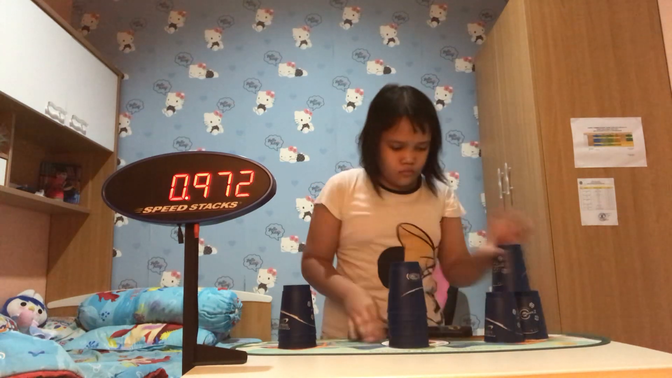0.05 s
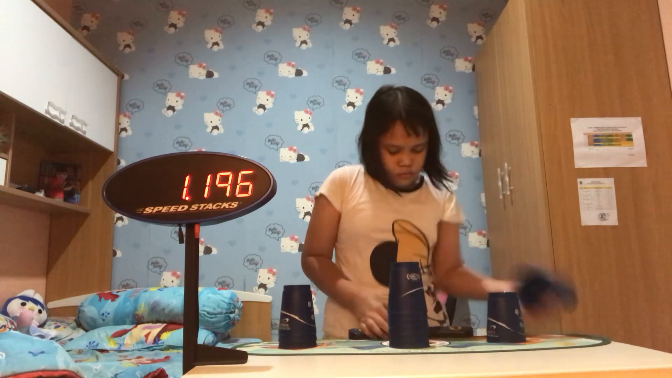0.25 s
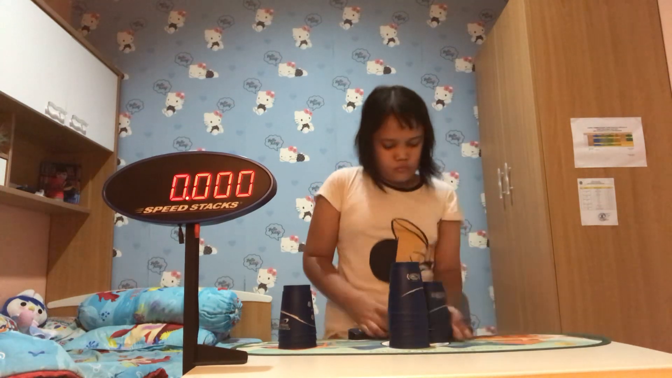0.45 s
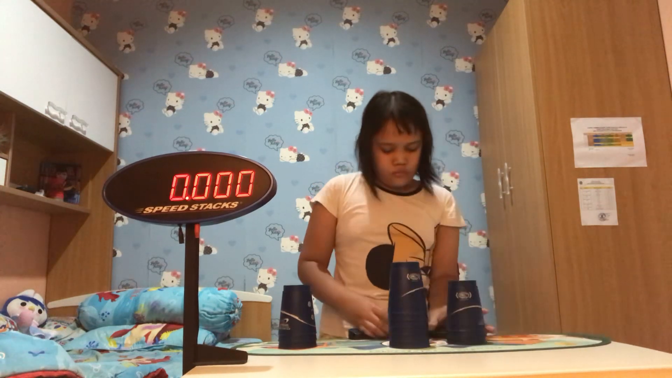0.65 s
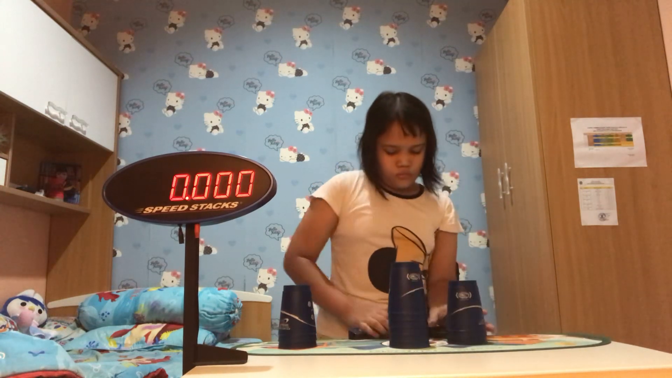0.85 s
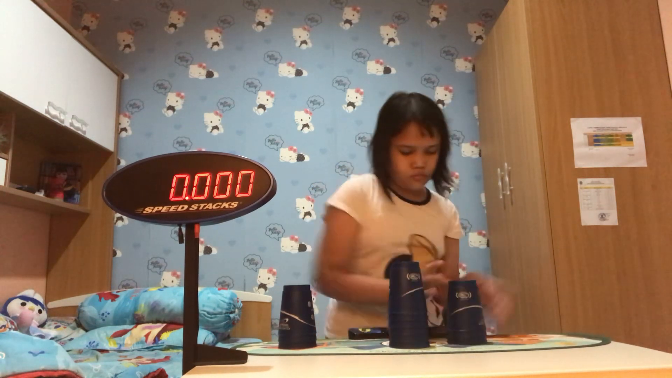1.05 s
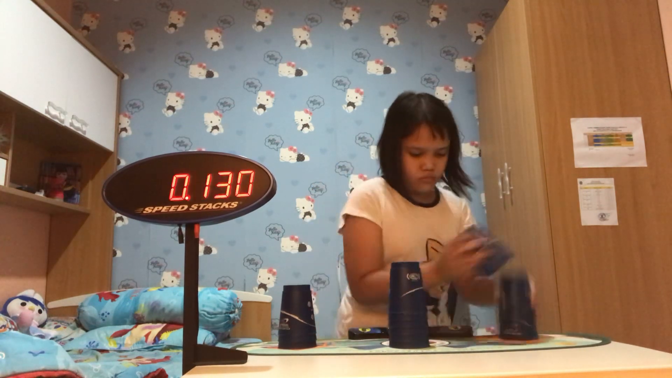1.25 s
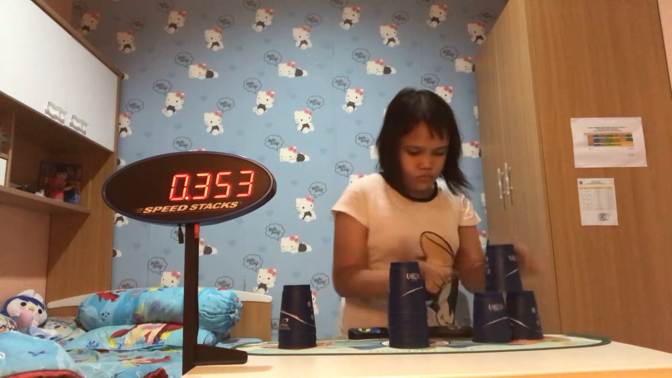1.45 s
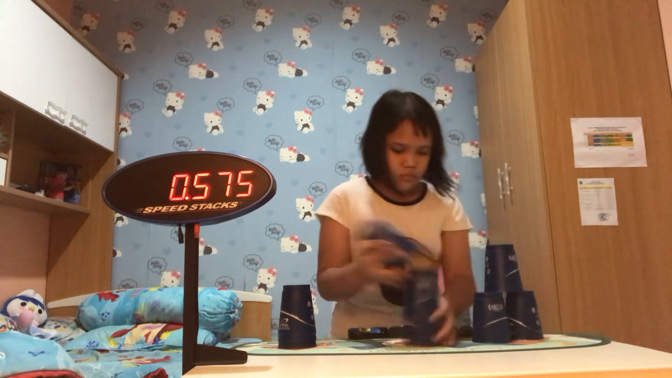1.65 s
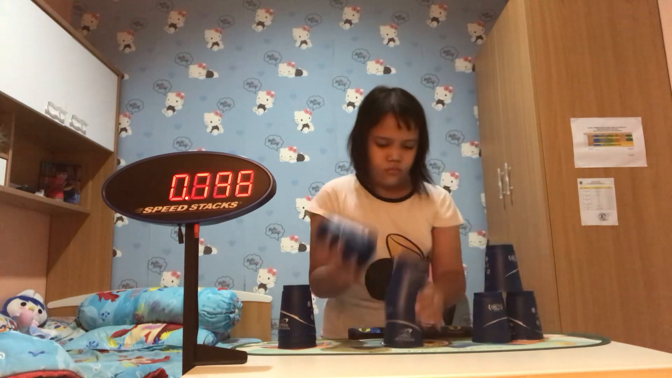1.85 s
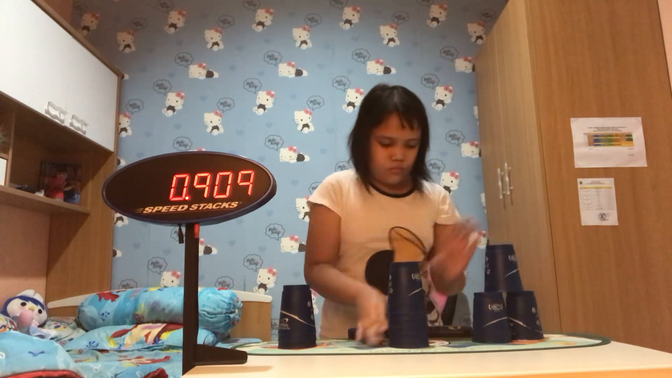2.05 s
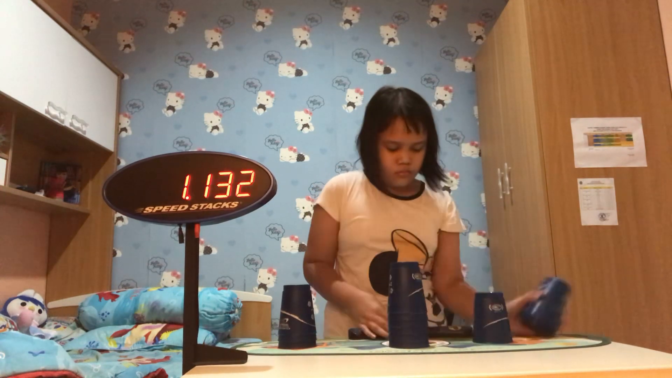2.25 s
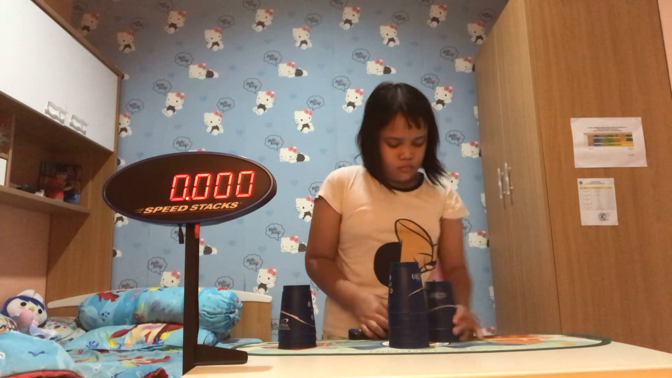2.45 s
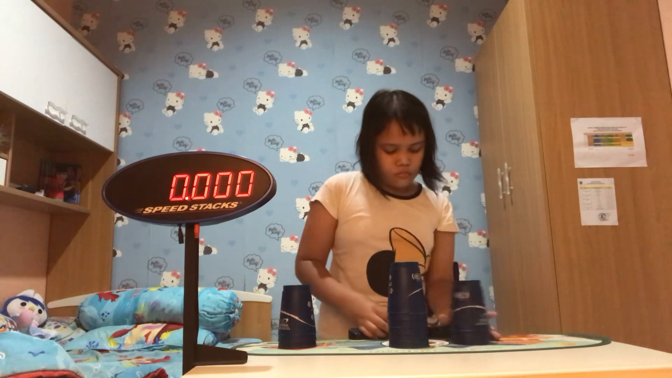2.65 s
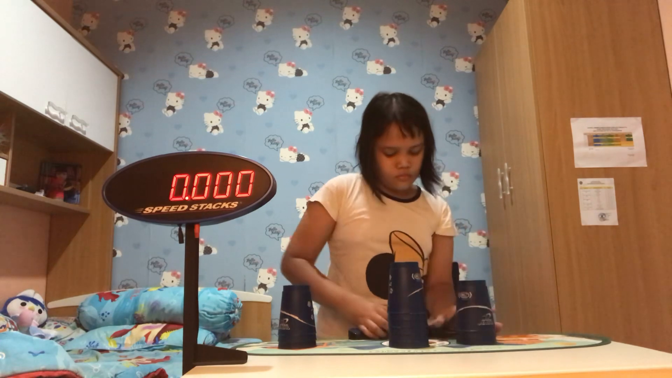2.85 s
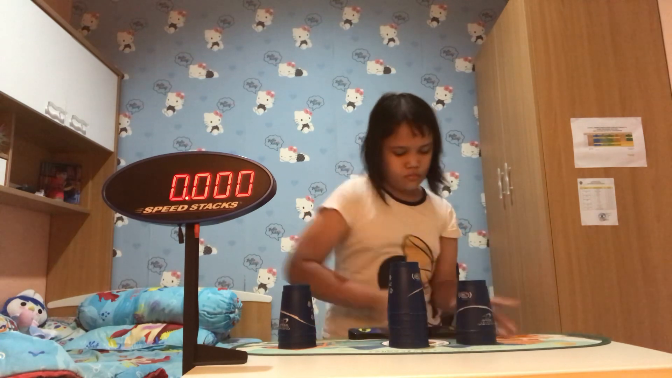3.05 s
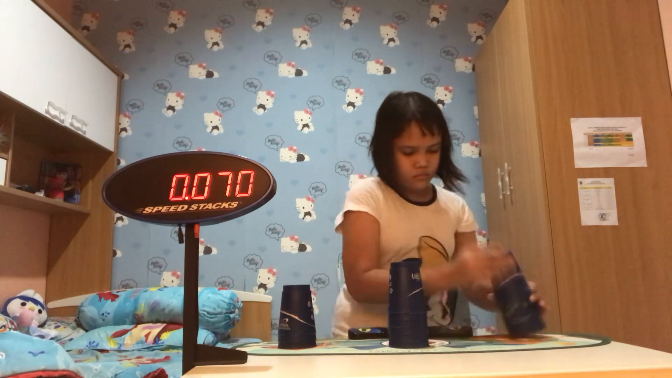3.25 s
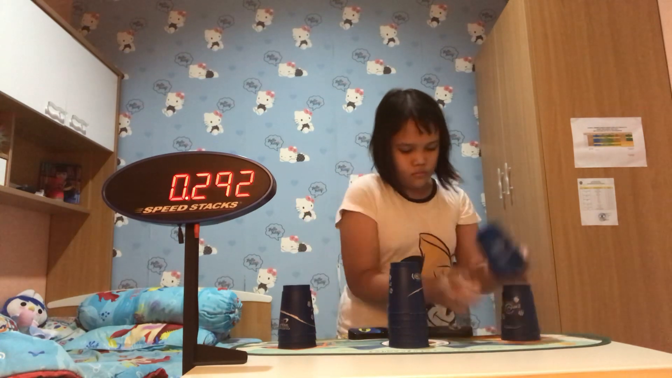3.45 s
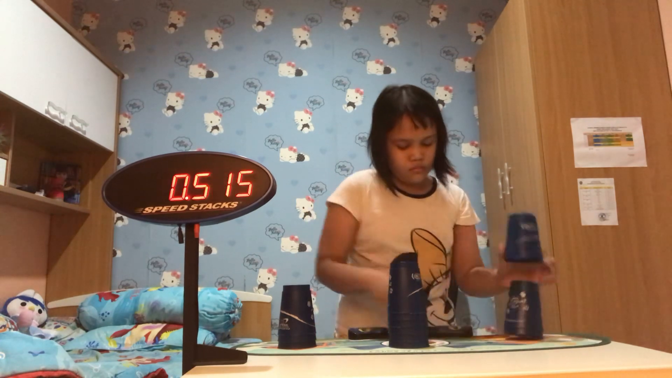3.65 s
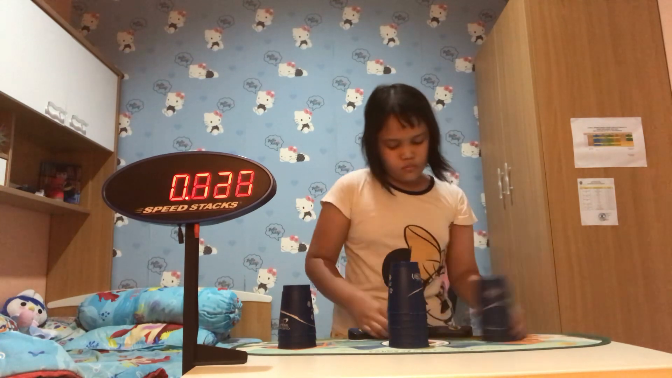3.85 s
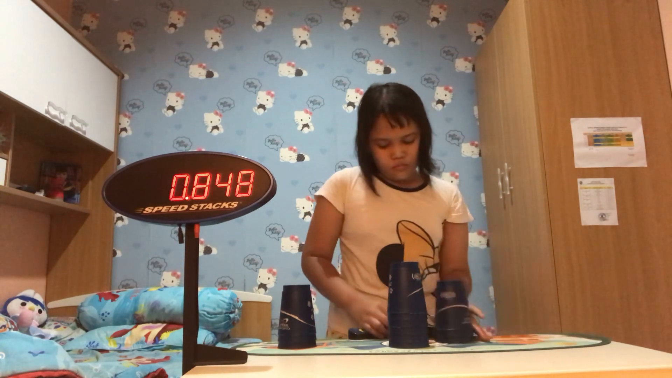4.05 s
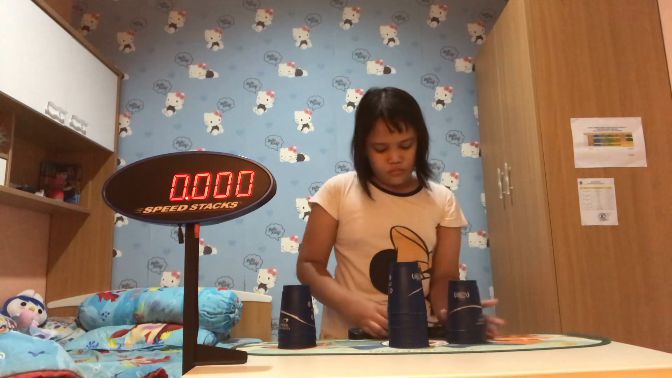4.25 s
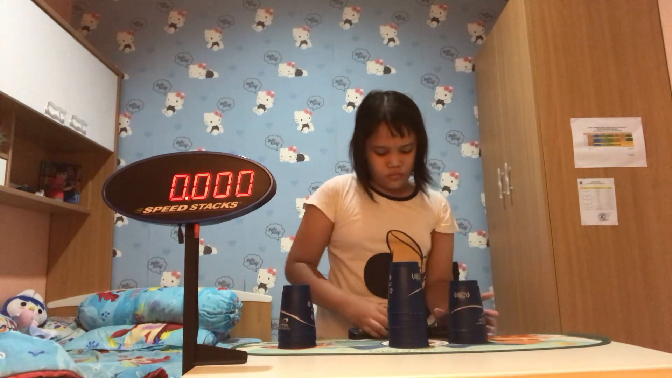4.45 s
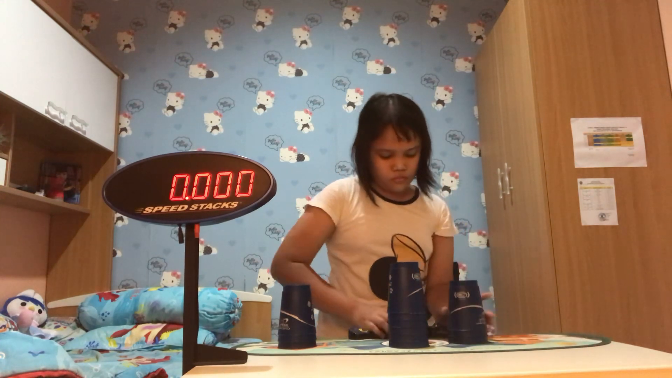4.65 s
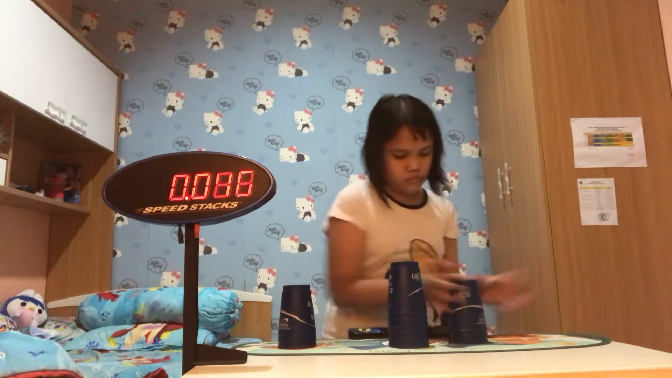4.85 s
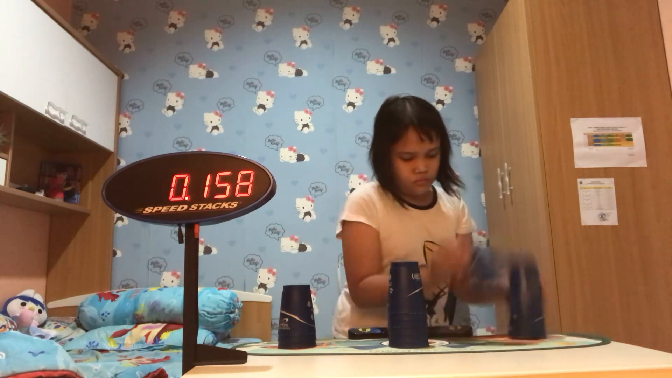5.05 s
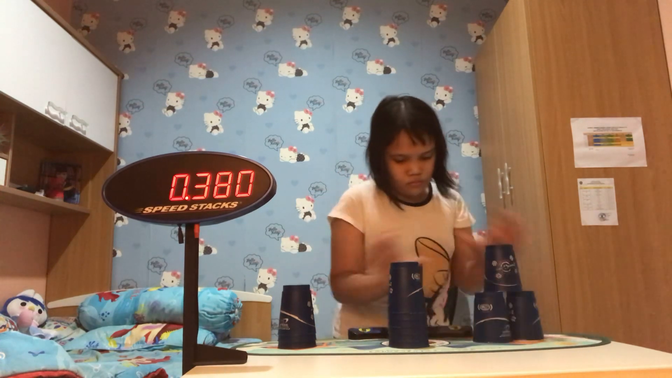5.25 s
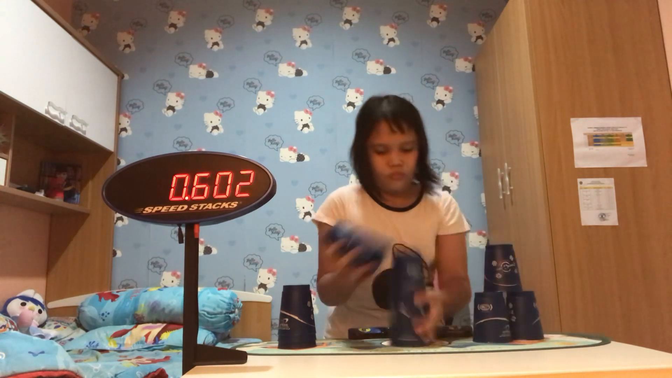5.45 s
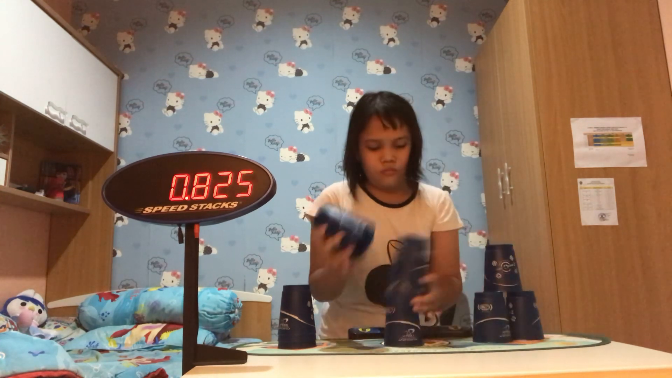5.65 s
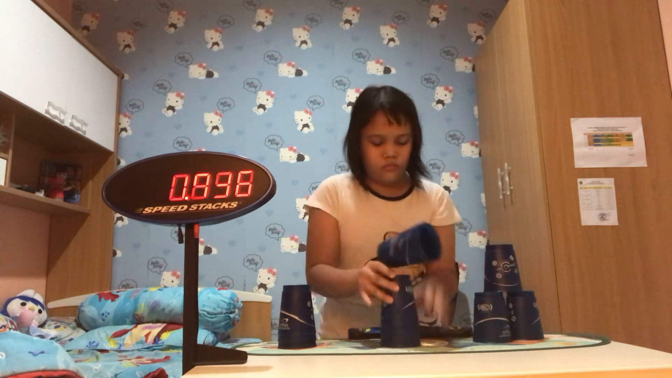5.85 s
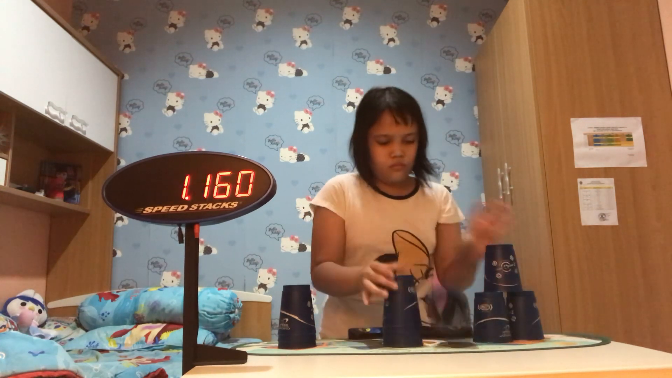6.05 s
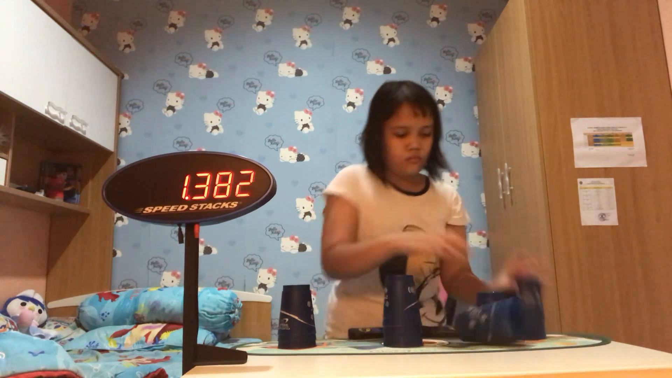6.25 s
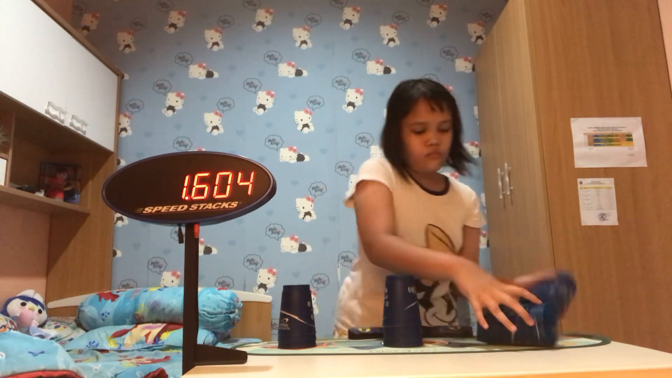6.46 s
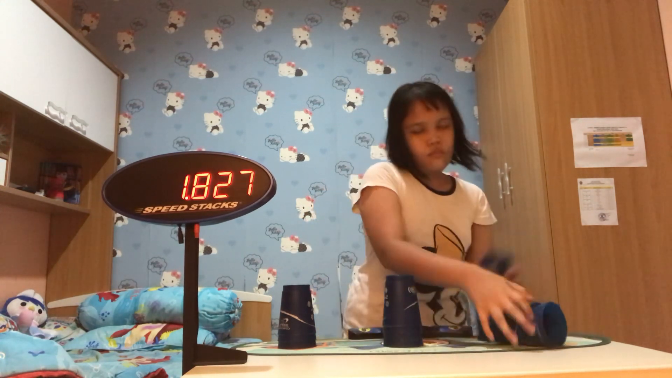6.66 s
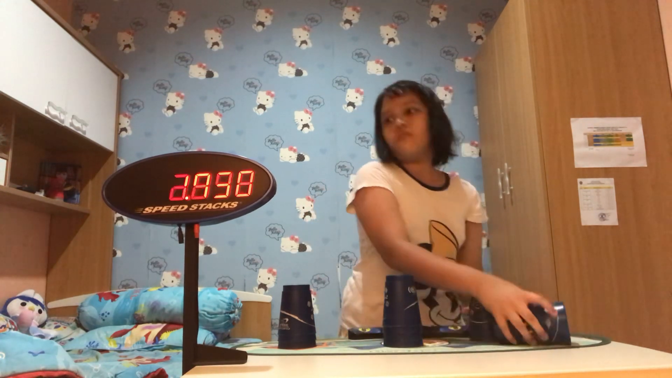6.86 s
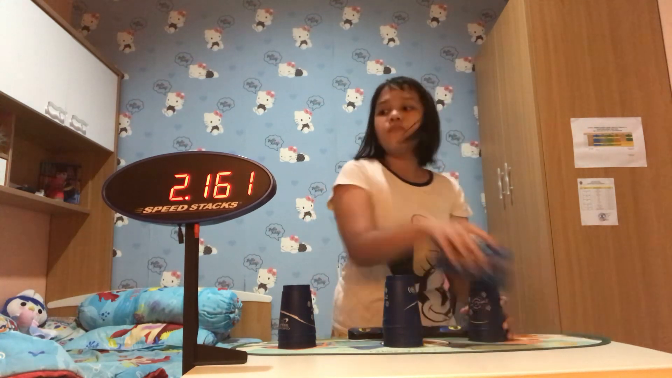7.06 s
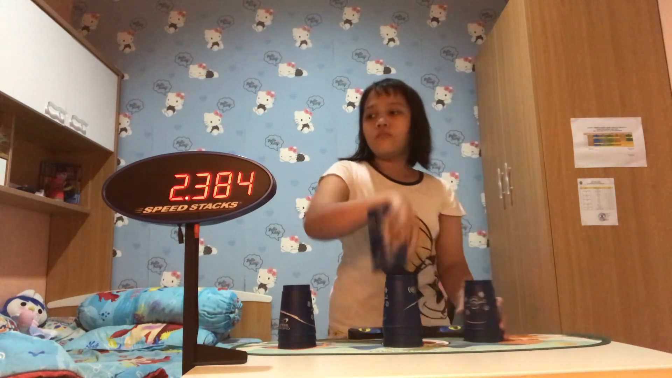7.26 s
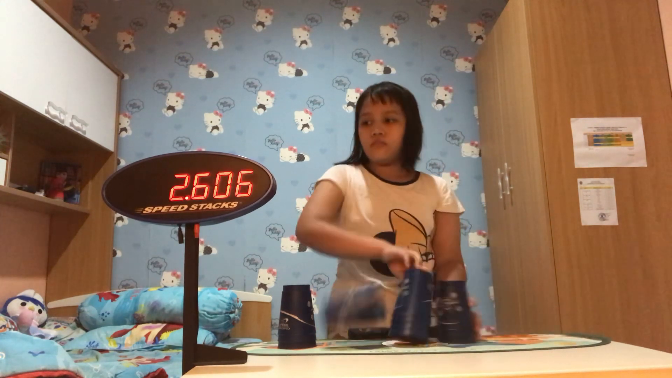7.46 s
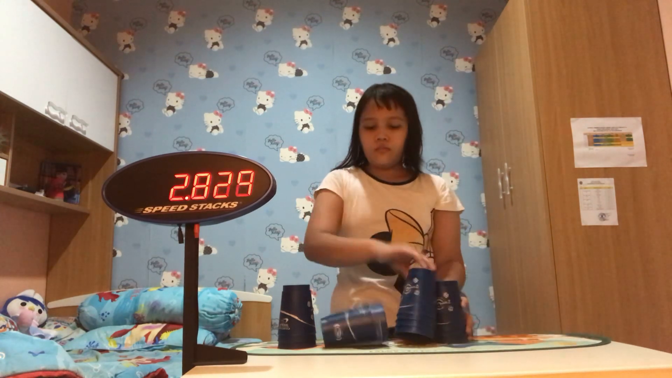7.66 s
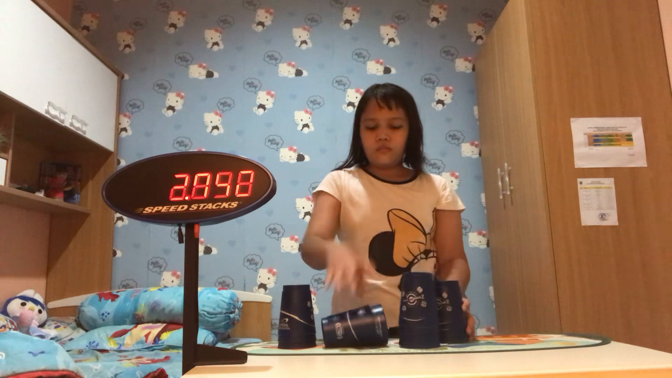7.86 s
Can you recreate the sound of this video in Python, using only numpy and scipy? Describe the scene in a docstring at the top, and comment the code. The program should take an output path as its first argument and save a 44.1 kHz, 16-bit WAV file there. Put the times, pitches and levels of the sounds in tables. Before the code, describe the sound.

Quick flurries of sharp plastic clacks, hollow pops and muffled thumps come from cups being piled up and nested again on a table with a mat. A short burst opens, a longer and louder one follows, then a lighter one, and after a pause a long uneven run. Each knock rings briefly in a small bedroom, over faint household rumble and microphone hiss.

```python
"""Fast clacks, pops and thumps: hard plastic cups stacked and unstacked on a mat-covered table.
Rims crack, tick and slide on each other and the cup walls ring; the air in a landing cup pops,
and the table top thumps through the mat. A small bedroom answers every blow for about half
a second, over a faint steady rumble and hiss."""
import sys
import numpy as np
from scipy import signal
from scipy.fft import rfft, irfft, next_fast_len
from scipy.io import wavfile
from scipy.ndimage import map_coordinates

SR = 44100
rng = np.random.default_rng(int(sys.argv[2]) if len(sys.argv) > 2 else 0)


def unload_audio(sound):
    """Save the sound as a 16-bit wav file, at the path given as the first command line argument."""
    columns = np.transpose(np.atleast_2d(sound))
    # keep every value between -1 and 1, then stretch to whole-number steps
    steps = np.round(np.clip(columns, -1, 1) * 32767)
    wavfile.write(sys.argv[1], SR, steps.astype(np.int16))


N = 348817

# Cup on cup: t/s, crack peak/dB, wall ring/dB re crack, wall f/Hz, hollow f/Hz, tick/dB re crack
RIM_HITS = [(0.0, -32, 6.5, 1254, 1734, -28), (0.1243, -34.5, -1, 1390, 2770, -13),
            (0.1367, -36, -5, 1480, 2750, 0), (0.177, -14, -2.5, 950, 2143, -11.5),
            (0.3065, -26, -4, 990, 3240, -19), (0.3267, -37.5, -5, 977, 3170, 6.5),
            (0.3521, -12.5, 1.5, 928, 4160, -4), (1.1057, -31.5, -7, 1020, 2970, -12),
            (1.1844, -33, -2, 920, 1940, -14), (1.3368, -23, 11.5, 990, 2330, -30),
            (1.3843, -22, 3, 1250, 4950, -14), (1.5554, -43, 2.5, 1360, 1867, 3),
            (1.6328, -25.5, -10.5, 1220, 3030, -8), (1.8398, -27.5, -21, 1170, 3490, -3),
            (1.8774, -34, -6, 990, 2256, -14), (1.8905, -18.5, -5, 1350, 1706, -21),
            (1.9649, -26, -1, 1070, 4580, -2), (1.9992, -12, 3.5, 1370, 2196, -13),
            (2.1793, -28, -21, 1370, 5540, -3), (2.2044, -25.5, -17, 970, 3293, -9),
            (2.227, -10, -4.5, 980, 5080, -5), (2.374, -19, 1, 902, 3220, -6),
            (2.4261, -14, -8.5, 1050, 1855, -6.5), (3.0056, -54.5, -8, 1260, 2020, -21),
            (3.174, -36, -2, 1010, 3276, -7), (3.248, -25, -3, 1055, 3170, -15),
            (3.3406, -35.5, -21, 1100, 3200, 2), (3.3661, -37, -2, 900, 3060, -17),
            (3.4599, -29.5, -2.5, 1080, 3150, -15), (3.7159, -45, -23, 907, 3250, -22),
            (3.7592, -35, -3.5, 1100, 3100, -7), (3.7974, -32.5, -0.5, 1286, 3080, -2),
            (3.8743, -37, 1.5, 1520, 1860, 1), (4.8728, -48, 0.5, 1090, 1870, -7),
            (4.9641, -20.5, -5, 1145, 1796, -21), (4.9755, -17, -6.5, 1430, 3300, -7),
            (5.1141, -22, 10.5, 1057, 1800, -34), (5.1591, -19.5, 2.5, 1000, 5270, -3.9),
            (5.3338, -38, -17, 1050, 2500, -16), (5.3592, -40, 1, 900, 2060, -31),
            (5.393, -22.5, -2, 1210, 2450, -27), (5.4762, -35, -1.5, 990, 2520, -1),
            (5.5788, -27.5, -8, 1030, 4840, -17), (5.6712, -35, -7, 1060, 3240, -6),
            (5.7461, -17, -13.5, 1120, 2184, -12.5), (5.9343, -37, -21, 1100, 3040, 2),
            (6.0843, -20.5, -7, 1110, 2980, -8.5), (6.1024, -43, 1, 1080, 3000, 6),
            (6.1998, -46, -9, 1080, 3000, 0), (6.2443, -32.5, -1, 1100, 1940, -6),
            (6.2594, -45, -9, 1100, 3200, 6), (6.2837, -20.5, -6, 1060, 3250, 4.5),
            (6.4496, -34.5, -1, 1030, 1890, 3), (6.5375, -41, -1, 1100, 3120, -10),
            (6.6024, -47, -6, 1100, 3140, -2), (6.6297, -36.5, 0, 1150, 5390, 5.5),
            (6.6732, -38.5, -12, 996, 3160, -19), (6.6978, -32, -1, 1020, 2956, -10),
            (6.7276, -21.5, -1, 960, 1840, -9), (7.2885, -24, -6.5, 1050, 1927, -29),
            (7.3136, -20, -11, 1050, 3270, -10), (7.3783, -30.5, -5, 1090, 3220, -9),
            (7.4864, -23, -11, 1090, 1893, -3.3), (7.5133, -25.5, -4, 1300, 3120, -51),
            (7.6147, -32.5, 2, 1070, 3100, -22), (7.672, -32.5, -2.5, 1294, 2080, -45),
            (7.6952, -38, -7, 1060, 1970, -10), (7.8292, -47.5, -7, 880, 2000, -40),
            (7.8555, -45, -2, 1630, 1970, -30)]
# Contact noise spectrum of the plastic: f/Hz, density/dB
PLASTIC_SPECTRUM = [(710, -10.5), (1200, -5.5), (1410, -10.5), (1660, -3.5), (1870, -6.5), (2320, -9),
                    (2710, -10.5), (3320, -8), (4650, -13.5), (5470, -7), (6370, -20), (9110, -13),
                    (11200, -22), (15000, -25), (16000, -28.5)]


def amp(db):
    """dB to gain."""
    return 10 ** (np.asarray(db) / 20)


def along(points, hz):
    """Interpolate (f/Hz, value) points over log frequency."""
    f, v = np.transpose(points)
    return np.interp(np.log(hz + 1), np.log(f + 1), v)


def coloured(x, gain):
    """Filter x by gain(hz), zero phase."""
    m = next_fast_len(len(x) + 8192)
    return irfft(rfft(x, m) * gain(np.fft.rfftfreq(m, 1 / SR)), m)[:len(x)]


def add(track, at_s, sound):
    """Mix sound into track."""
    start = max(round(at_s * SR), 0)
    track[start:start + len(sound)] += sound[:max(N - start, 0)]


def swell(t, peak_s):
    """Envelope of a soft blow on a resonator: 1 at peak_s, then decay."""
    u = t / peak_s
    return u ** 2 * np.exp(2 - 2 * u)


def chatter(n, hold_samples, scatter_db):
    """Uneven contacts: n samples of stepped random gain."""
    return amp(scatter_db * np.repeat(rng.standard_normal(n // hold_samples), hold_samples))


def ring(modes, t, rise_s, scatter_db):
    """Damped modes, new strengths and signs at each blow."""
    signs = rng.choice([-1, 1], len(modes))
    levels_db = rng.normal(0, scatter_db, len(modes))
    tones = sum(sign * amp(db + level_db - 60 * t / t60_s) * np.sin(2 * np.pi * hz * t)
                for (hz, db, t60_s), sign, level_db in zip(modes, signs, levels_db))
    return tones * (1 - np.exp(-t / rise_s))


def crack_colour(hz, hollow_hz, tick_db):
    """Gain: plastic spectrum, brighter with the tick; grip or nesting lifts one hollow note."""
    tilt_db = 0.088 * tick_db * np.clip(2.3 * np.log2((hz + 1) / 5500), -.7, 1.5)
    hollow_db = 7.5 * np.exp(-(np.log2((hz + 1) / hollow_hz) / 0.09) ** 2)
    return amp(along(PLASTIC_SPECTRUM, hz) + tilt_db + hollow_db)


def rim_clacks():
    """Rims crack, rebound and chatter; the cup wall rings. Returns (direct, room send)."""
    direct, send, t = np.zeros(N), np.zeros(N), np.arange(SR // 10) / SR
    touch_s, rebound_s = 0.002, 0.0055
    impulse = signal.unit_impulse(len(t), 88)
    # top treble beams at the microphone
    beam = lambda hz: amp(3.0 * np.clip(np.log2((hz + 1) / 5000), 0, 1))
    for at_s, db, wall_db, wall_hz, hollow_hz, tick_db in RIM_HITS:
        colour = lambda hz: crack_colour(hz, hollow_hz, tick_db)
        noise = coloured(rng.standard_normal(len(t)), lambda hz: colour(hz) * beam(hz))
        rebounds = 0.26 * chatter(len(t), hold_samples=30, scatter_db=3) * swell(t, rebound_s)
        crack = (swell(t, touch_s) + rebounds) * noise
        crack = amp(db) * crack / np.abs(crack).max()
        # summed over all directions: smooth spectrum, same energy
        diffuse = coloured(impulse, colour)
        diffuse *= np.linalg.norm(crack) / np.linalg.norm(diffuse)
        # grip and nesting tune the wall and damp it within a few cycles
        wall = amp(db + wall_db) * swell(t, peak_s=0.0015) * np.sin(2 * np.pi * wall_hz * t)
        add(direct, at_s, crack + wall)
        add(send, at_s, diffuse + wall)
    return direct, send


def rim_ticks():
    """Thin rim edges: a millisecond of narrow treble noise per clack."""
    track, t = np.zeros(N), np.arange(SR // 50) / SR
    centre_hz, width_hz = 9280, 830
    band = lambda hz: np.exp(-((hz - centre_hz) / width_hz) ** 2)
    for at_s, db, *_, tick_db in RIM_HITS:
        tick = swell(t, peak_s=0.00035) * coloured(rng.standard_normal(len(t)), band)
        add(track, at_s, amp(db + tick_db) * tick / np.abs(tick).max())
    return track


def air_pops():
    """Air in a landing cup swells for a few cycles and stops as the rim seals on the mat."""
    # Air column pulses: t/s, peak/dB
    landings = [(0.0, -28.5), (0.142, -27), (0.213, -25), (0.287, -22.5), (0.358, -12.5), (1.109, -31.5),
                (1.191, -35), (1.333, -7), (1.389, -19.5), (1.563, -34.5), (1.636, -26), (1.761, -39),
                (1.847, -27.5), (1.894, -8), (1.977, -26.5), (2.002, -14.5), (2.148, -29.5), (2.229, -22),
                (2.377, -4), (2.428, -9), (3.177, -35), (3.25, -32.5), (3.462, -27), (3.72, -38),
                (3.807, -33), (3.877, -34), (3.899, -36), (4.874, -44), (4.966, -25.5), (5.015, -24),
                (5.115, -5.5), (5.159, -15), (5.241, -38), (5.348, -33), (5.395, -25), (5.613, -29.5),
                (5.675, -35), (5.749, -16), (5.939, -32.5), (6.087, -19.5), (6.194, -32), (6.243, -33),
                (6.286, -28), (6.31, -24.5), (6.677, -36), (6.731, -20), (7.291, -24), (7.316, -31),
                (7.457, -39), (7.489, -25.5), (7.675, -31.5), (7.829, -34)]
    track, t = np.zeros(N), np.arange(SR // 10) / SR
    air_hz = 682  # one cup size
    for at_s, db in landings:
        phase = rng.uniform(0, 2 * np.pi)
        hz = air_hz * (1 + 0.022 * rng.standard_normal())  # landing tilt shifts the note
        pop = swell(t, peak_s=0.0036) ** 2 * np.sin(2 * np.pi * hz * t + phase)
        add(track, at_s - .002, amp(db) * pop)
    return track


def table_thumps():
    """The mat softens each blow: the lowest board mode swells, the upper ones ring on."""
    # Cups and hands on the table: t/s, low mode peak/dB, f/Hz, upper modes/dB re low mode
    blows = [(0.0, -30.5, 190, -4), (0.193, -20, 120, -18.5), (0.269, -22.5, 115, -12),
             (0.334, -11.5, 146, -24), (0.349, -13.5, 138, -9.5), (1.111, -17, 145, -24.5),
             (1.332, -11.5, 152, -13.5), (1.573, -25, 107, -25), (1.641, -15, 135, -18),
             (1.845, -26, 208, -18), (1.889, -14.5, 141, -16), (1.971, -15.5, 144, -13.5),
             (1.999, -10, 124, -13), (2.234, -25.5, 134, -12), (2.377, -13.5, 146, -13.5),
             (2.426, -8.5, 139, -14), (3.042, -51, 120, -15), (3.182, -21, 131, -25),
             (3.262, -32.5, 161, -7.5), (3.33, -36, 134, -10), (3.469, -27, 152, -19.5),
             (3.714, -40.5, 145, -20.5), (3.803, -21, 140, -21), (3.879, -25, 144, -17.5),
             (4.283, -43, 139.5, -29), (4.887, -31.5, 144, -20), (5.013, -28.5, 158, -2.5),
             (5.115, -14, 139, -10.5), (5.322, -25.5, 121, -20), (5.344, -19.5, 122, -20.5),
             (5.426, -22, 124, -22), (5.615, -20, 131, -18), (5.754, -18, 130, -19.5),
             (5.799, -21.5, 120, -40), (5.866, -22, 123, -21), (6.087, -15.5, 132, -13),
             (6.237, -29, 113, -8), (6.38, -23, 130, -15.5), (6.631, -28, 156, -15.5),
             (6.728, -20.5, 140, -20.5), (6.948, -46.5, 135, -21), (7.29, -27, 206, -9.5),
             (7.313, -23, 145, -13), (7.38, -26.5, 113, -18), (7.494, -21.5, 164, -8.5),
             (7.528, -33.5, 185, 0), (7.831, -24, 114, -21.5)]
    # Upper table modes: f/Hz, relative level/dB, t60/s
    board_modes = [(185, -1, 0.25), (229, 7, 0.11), (279.3, 3.5, 0.081), (320.6, -5.5, 0.55),
                   (360.1, -3.5, 0.17), (412.2, 5, 0.054), (514, -2, 0.081)]
    track, t = np.zeros(N), np.arange(SR // 2) / SR
    for at_s, db, hz, upper_db in blows:
        phase = rng.uniform(0, 2 * np.pi)
        low = swell(t, peak_s=0.0082) * np.sin(2 * np.pi * hz * t + phase)
        upper = amp(upper_db) * ring(board_modes, t, rise_s=0.0016, scatter_db=2.5)
        add(track, at_s - .003, amp(db) * (low + upper))
    return track


def cup_slides():
    """Ribs and rims scrape: noise broken into tiny uneven contacts."""
    # Cup sliding on cup or mat: t/s, rms at peak/dB, time to peak/s
    scrapes = [(0.0, -53, 0.028), (0.1361, -43, 0.015), (0.1898, -46, 0.039), (0.3522, -40.5, 0.0091),
               (1.1866, -52, 0.02), (1.3843, -41.5, 0.02), (1.9632, -37, 0.014), (2.2378, -38.5, 0.036),
               (3.247, -56, 0.018), (3.7798, -53.5, 0.045), (4.9766, -36, 0.013), (5.1571, -50, 0.0081),
               (5.4094, -50, 0.025), (5.758, -51.5, 0.02), (6.26, -50, 0.02), (6.3802, -42.5, 0.011),
               (6.6288, -51.5, 0.022), (6.6994, -56, 0.018), (6.75, -52.5, 0.05)]
    track, t = np.zeros(N), np.arange(SR // 3) / SR
    for at_s, db, peak_s in scrapes:
        contacts = chatter(len(t), hold_samples=60, scatter_db=5) * rng.standard_normal(len(t))
        noise = coloured(contacts, lambda hz: amp(along(PLASTIC_SPECTRUM, hz)))
        add(track, at_s, amp(db) * swell(t, peak_s) * noise / noise.std())
    return track


def room(x, gap_s, linger_db):
    """Two-slope decay per frequency; the hands move, so the echoes are new every 0.1 s."""
    # First decay: f/Hz, t60/s
    early_decay = [(80, 0.14), (210, 0.57), (560, 0.43), (1470, 0.34), (3880, 0.36), (10200, 0.33)]
    # Slow tail between bare walls: f/Hz, t60/s
    late_decay = [(80, 0.45), (250, 0.69), (700, 0.94), (2000, 0.96), (5000, 0.83), (12000, 0.79)]
    # Echo strength: f/Hz, gain/dB
    wetness = [(100, -6), (300, 6), (700, 3.5), (1500, 4.5), (4000, 2), (10000, 3)]
    wet, step = np.zeros(N), SR // 10
    for start in range(0, N, step):
        hz, t, noise = signal.stft(rng.standard_normal(SR * 3 // 4), SR, nperseg=256)
        hz = hz[:, None]
        early_s, late_s = along(early_decay, hz), along(late_decay, hz)
        fall = np.hypot(amp(-60 * t / early_s), amp(linger_db - 60 * t / late_s))
        build_up = 1 - np.exp(-(t + 0.0089) / 0.0072)
        gain = amp(along(wetness, hz)) * np.sqrt(6 * np.log(10) / early_s / SR)
        tail = signal.istft(noise * fall * build_up * gain, SR, nperseg=256)[1]
        add(wet, start / SR + gap_s, signal.fftconvolve(x[start:start + step], tail))
    return wet


def ambience(level_db, drift_db):
    """Distant household rumble and microphone hiss, the level drifting a little."""
    # Noise floor: f/Hz, relative density/dB
    floor_spectrum = [(15, -83.5), (25, -39), (82, 1.5), (354, -17.5), (394, -10.5), (489, -24.5),
                      (607, -21), (659, -13.5), (714, -27), (936, -32.5), (5730, -42), (10400, -42.5),
                      (16000, -49)]
    noise = coloured(rng.standard_normal(N), lambda hz: amp(along(floor_spectrum, hz)))
    knots_per_s = 6
    knots = rng.standard_normal(N * knots_per_s // SR + 4)
    drift = map_coordinates(knots, [np.arange(N) * knots_per_s / SR])
    return amp(level_db + drift_db * drift) * noise / noise.std()


def scene():
    """Cups and table, their echoes and the noise floor; mono."""
    clack, clack_send = rim_clacks()
    tick, slide, pop, thump = rim_ticks(), cup_slides(), air_pops(), table_thumps()
    direct = clack + tick + slide + pop + thump
    # ticks, cup mouths and table radiate toward the microphone: the room gets less
    send = clack_send + slide + amp(-9.5) * tick + amp(-1.5) * pop + amp(-1) * thump
    echoes = room(send, gap_s=0.0036, linger_db=-15.0)
    return (direct + echoes + ambience(level_db=-56, drift_db=1.2))[None]


def record(dry):
    """Small microphone: deep bass rolled off, hard upper band limit."""
    low_hz, top_hz = 65, 15900
    highpass = signal.butter(3, low_hz, "highpass", fs=SR, output="sos")
    return coloured(signal.sosfilt(highpass, dry[0]), lambda hz: hz < top_hz)[None]


dry = scene()
out = record(dry)
unload_audio(out)
```